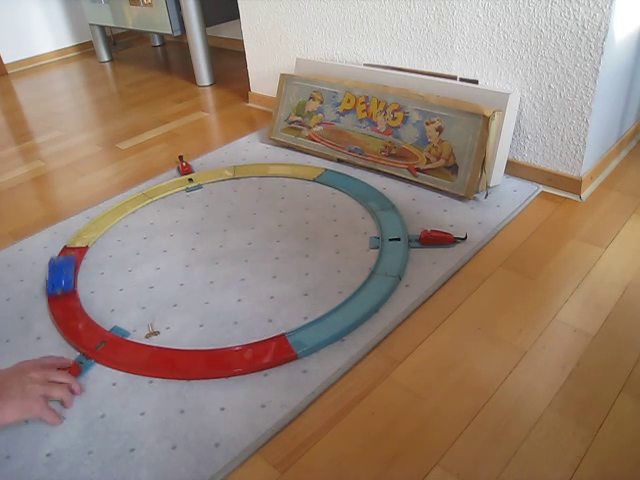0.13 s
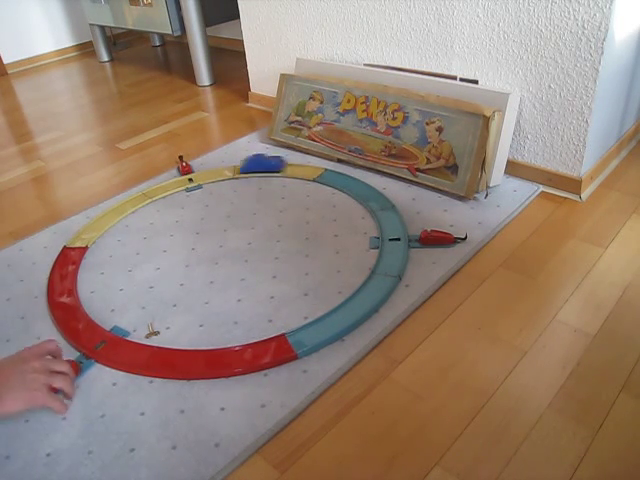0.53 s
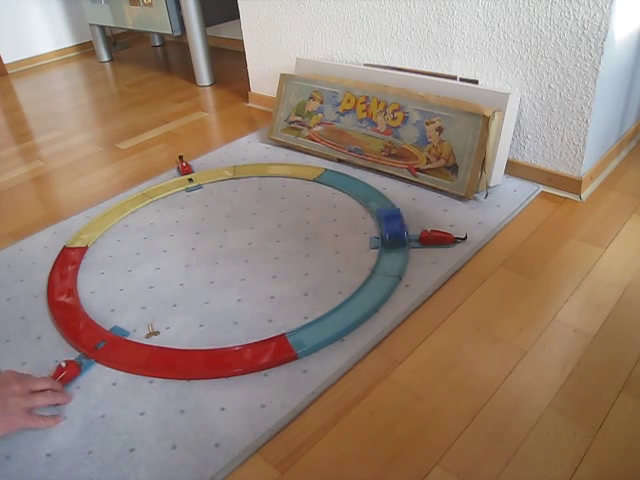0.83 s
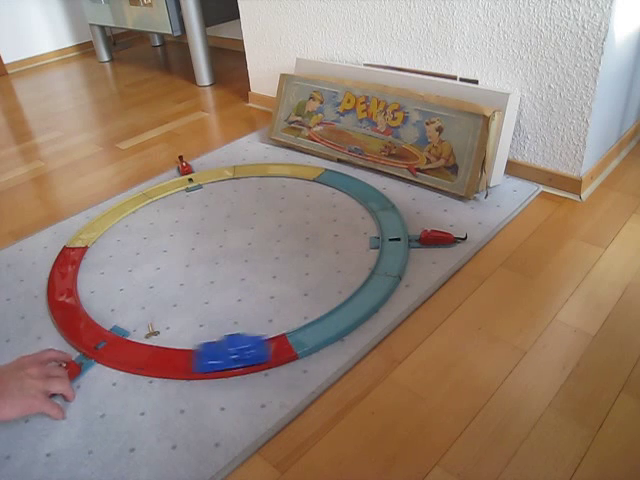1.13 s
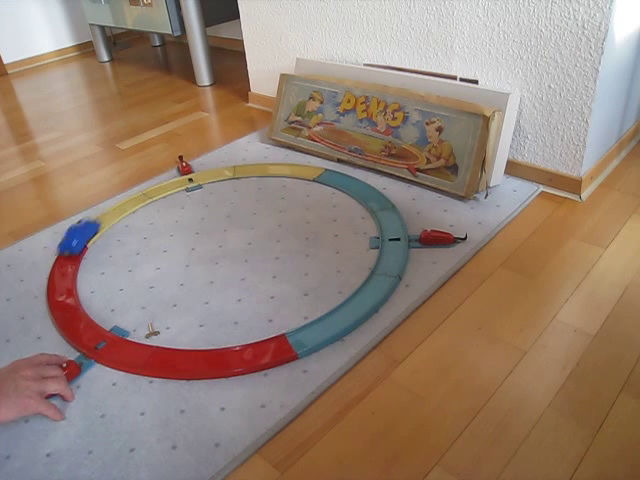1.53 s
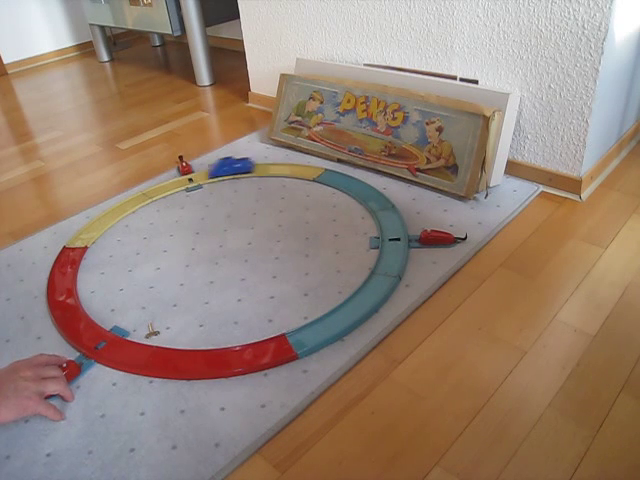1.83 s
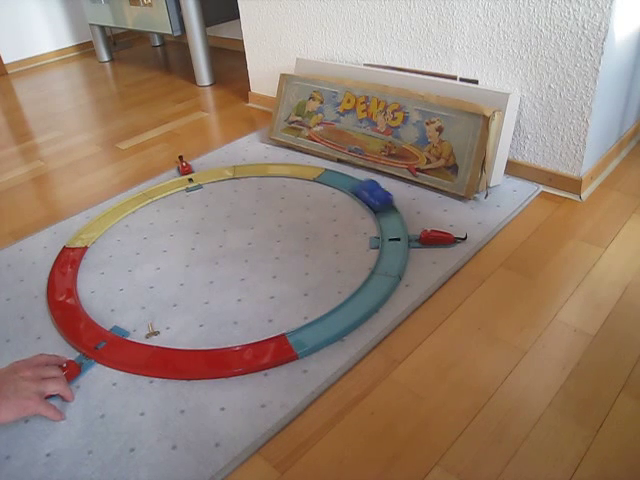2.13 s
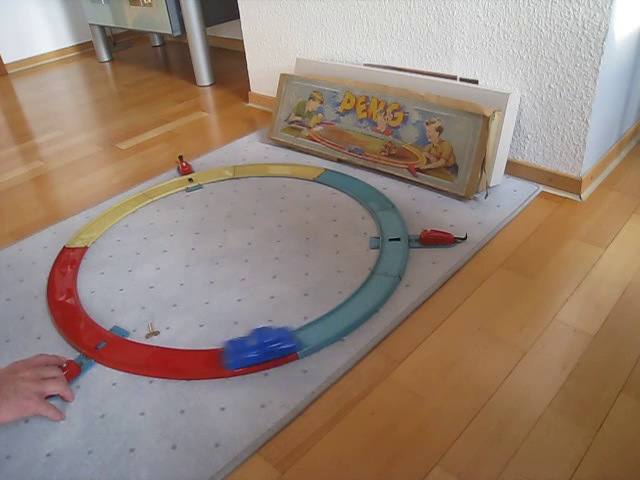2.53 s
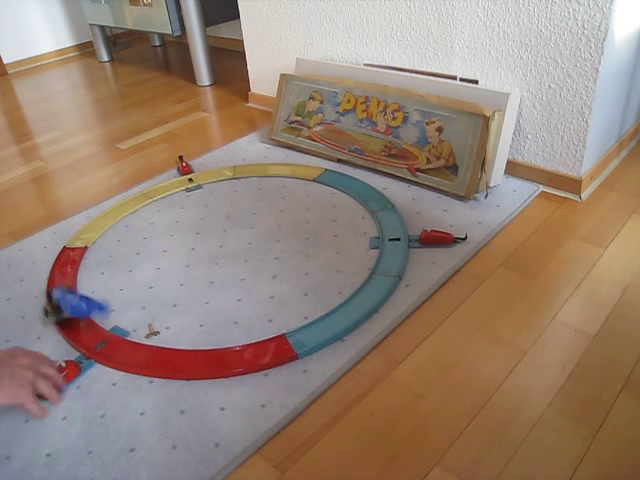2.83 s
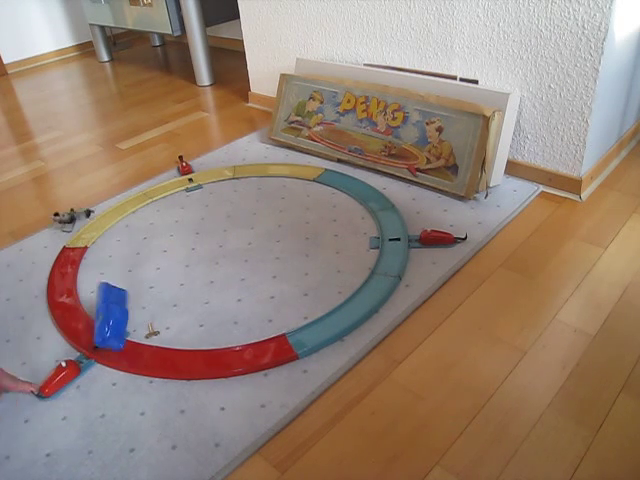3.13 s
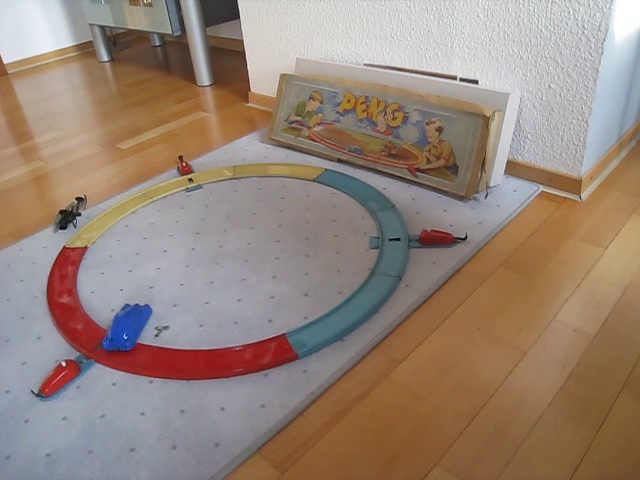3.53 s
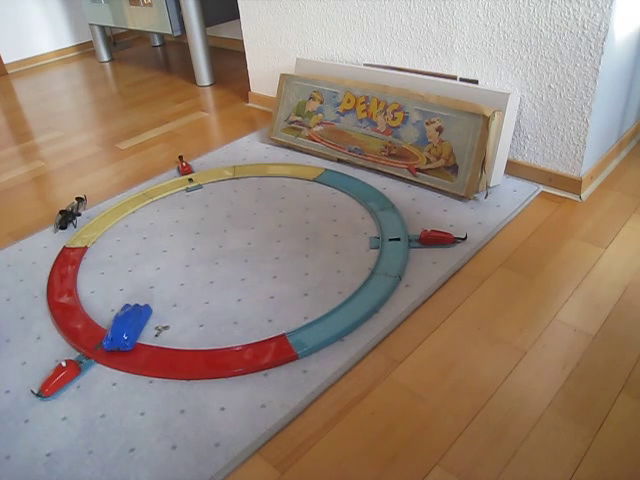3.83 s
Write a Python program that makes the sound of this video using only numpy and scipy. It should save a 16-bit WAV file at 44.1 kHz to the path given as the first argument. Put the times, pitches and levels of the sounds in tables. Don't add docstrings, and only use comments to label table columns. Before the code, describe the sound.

A clockwork tin car rattles steadily round hollow metal rails from 0 to 2.75 s, its gears fizzing brightly, with irregular sharp knocks and a tiny high squeal near 0.8 s. At about 2.77 s it crashes hard; the axle buzzes, the body skids and clatters, landing sharply around 3.23 s. It rocks briefly and the gears die by 3.6 s, leaving bare-room reverberation and faint hiss.

```python
import sys
import numpy as np
from scipy import signal
from scipy.fft import rfft, irfft, next_fast_len
from scipy.io import wavfile
from scipy.ndimage import uniform_filter1d, map_coordinates

SR = 44100
rng = np.random.default_rng(int(sys.argv[2]) if len(sys.argv) > 2 else 0)


def field_ratio(decibels):
    return 10 ** (np.asarray(decibels, dtype=float) / 20)


def store_pcm(level_fs):
    pcm = np.round(np.clip(level_fs, -1, 1) * 32767).astype(np.int16)
    wavfile.write(sys.argv[1], SR, np.atleast_2d(pcm).T)


N = 176400


def unit(x):
    return x / np.sqrt(np.mean(x ** 2) + 1e-20)


def along(points, hz):
    f, v = np.transpose(points)
    return np.interp(np.log(hz + 1), np.log(f + 1), v)


def curve(rows, axis=1):
    rows = np.array(rows)
    return np.interp(np.arange(N) / SR, rows[:, 0], rows[:, axis], left=-120, right=-120)


def wobble(rate):
    return map_coordinates(rng.standard_normal(4000), [np.arange(N) * rate / SR])


def filtered(x, response):
    m = next_fast_len(len(x) + 8192)
    return irfft(rfft(x, m) * response(np.fft.rfftfreq(m, 1 / SR)), m)[:len(x)]


def coloured(x, colour):
    return filtered(x, lambda f: field_ratio(along(colour, f)))


def low_cut(x, hz):
    return filtered(x, lambda f: (1j * f / (hz + 1j * f)) ** 2)


def resonances(table):
    def peak(f, c, w, db):
        return field_ratio(db) * 1j * f * w / (c * c - f * f + 1j * f * w)
    return lambda f: sum((-1) ** k * peak(f, *row) for k, row in enumerate(table))


def contacts(rate, spread_db, hiss):
    chance, size = rng.random(N), rng.exponential(size=N)
    sign, slide = rng.standard_normal((2, N))
    impacts = (chance < rate / SR) * field_ratio(spread_db * np.minimum(size, 4)) * np.sign(sign)
    return unit(unit(impacts) + hiss * slide)


def patches(x, depth_db):
    z = signal.stft(x, nperseg=512)[2]
    field = uniform_filter1d(uniform_filter1d(rng.standard_normal(z.shape), 3, 0), 10, 1)
    y = signal.istft(z * field_ratio(depth_db * unit(field)), nperseg=512)[1][:N]
    steady_s = .2
    return y / np.sqrt(np.abs(uniform_filter1d(y ** 2, round(steady_s * SR))) + 1e-20)


def ticks():
    taps_per_s, t60_s = 110, 0.0095
    starts = (rng.random(N) < taps_per_s / SR) * field_ratio(2.7 * np.minimum(rng.exponential(size=N), 3))
    bursts = signal.fftconvolve(starts, field_ratio(-60 * np.arange(2000) / SR / t60_s))[:N]
    return unit(bursts * rng.standard_normal(N))


def gliding(x, hz, width_hz):
    turn = 2 * np.pi * np.cumsum(hz) / SR
    slow = lambda v: filtered(v, lambda f: 1 / (1 + 2j * f / width_hz) ** 2)
    return unit(slow(x * np.cos(turn)) * np.cos(turn) + slow(x * np.sin(turn)) * np.sin(turn))


def rolling():
    # t/s, level/dB
    roll_level = [(0, -15), (.03, -15.5), (.14, -18.5), (.4, -18.5), (.6, -18), (.77, -20), (.8, -24.5),
                  (.9, -17), (1, -17), (1.3, -20), (1.6, -18), (1.9, -19.5), (2.2, -18), (2.4, -18.5),
                  (2.6, -17.5), (2.755, -18.5), (2.775, -17)]
    # f/Hz, gain/dB
    roll_colour = [(59, -64), (100, -32), (373, -17.5), (991, -3), (1760, -3.5), (3470, -1), (7770, -12.5),
                   (12700, -25.5), (16000, -38)]
    # f/Hz, width/Hz, level/dB
    tin = [(990, 100, -37), (1395, 204, 9.5), (1920, 980, -26), (2780, 370, -38), (3113, 94, -24),
           (4685, 130, -9), (5200, 390, -5)]
    # t/s, upper ring f/Hz, upper share/dB, lower ring f/Hz, lower share/dB
    sing = [(0.0, 3530, -25, 2580, -35), (0.08, 3630, -18, 2340, -27), (0.15, 3460, -22, 2430, -11),
            (0.52, 3720, -13.5, 2480, -22), (0.67, 3380, -10.5, 2345, -17), (1.05, 3960, -14.5, 2340, -18),
            (1.09, 3500, -3, 2560, -21), (1.16, 4030, -19, 2520, -18), (1.44, 3370, -12, 2470, -21),
            (2.0, 3650, -16, 2460, -17), (2.04, 3300, -11, 2380, -17), (2.3, 3900, -19, 2400, -20),
            (2.71, 3600, -19, 2530, -34), (2.77, 3670, -20, 2340, -16)]
    sing_width = (690, 400)

    def ring(column, width_hz, wobble_rate):
        patchy_db = 2.5 * wobble(wobble_rate)
        tone = gliding(drive, np.abs(curve(sing, axis=column)), width_hz)
        return field_ratio(curve(sing, axis=column + 1) + patchy_db) * tone

    unevenness_db = 0.46 * wobble(23.97) + 1.17 * wobble(90) + 0.15 * wobble(9.83)
    drive = contacts(2500, spread_db=1.5, hiss=0.7) * field_ratio(unevenness_db) + field_ratio(-12.5) * ticks()
    rattle = filtered(drive, lambda f: field_ratio(along(roll_colour, f)) * (1 + field_ratio(-1.9) * resonances(tin)(f)))
    upper = ring(1, sing_width[0], 13.6)
    lower = ring(3, sing_width[1], 14.2)
    return field_ratio(curve(roll_level) - 0.5) * (patches(rattle, depth_db=1.95) + upper + lower)


def gears():
    # t/s, level/dB
    gear_level = [(0, -19), (.4, -24.5), (.8, -22.5), (1.1, -22.5), (1.35, -22), (1.7, -24.5),
                  (2.06, -25.5), (2.3, -22.5), (2.6, -24.5), (2.76, -23), (2.85, -15.5), (2.95, -20),
                  (3.15, -17), (3.23, -22), (3.27, -27), (3.39, -22.5), (3.48, -32), (3.62, -57)]
    # f/Hz, gain/dB
    gear_colour = [(2000, -46.5), (4000, 1), (4900, 1.5), (6000, 1.5), (7000, -2), (9000, 5), (13000, 4),
                   (17000, 3)]
    unevenness_db = 1.3 * wobble(22.66) + 1.7 * wobble(118) + 0.46 * wobble(32.2)
    drive = contacts(4000, spread_db=3.5, hiss=0.73) * field_ratio(unevenness_db)
    return field_ratio(curve(gear_level) - 1.0) * patches(coloured(drive, gear_colour), depth_db=1.5)


def knocks():
    # t/s, peak/dB, centre f/Hz, t60/s, thump/dB
    knock_list = [(0.0045, 4.5, 5000, 0.017, -53), (0.834, -1, 9900, 0.057, -51),
                  (1.2555, -2, 2550, 0.028, -57), (1.3132, -5.5, 2970, 0.056, -53),
                  (2.1184, -7, 3500, 0.025, -45), (2.7602, -7, 6950, 0.01, -35),
                  (2.7639, 1.5, 6960, 0.062, -34), (2.7688, 3, 11000, 0.054, -9.5),
                  (2.7714, 0.5, 1490, 0.049, -36), (2.7871, 15, 6660, 0.026, -34),
                  (2.8935, 0, 2500, 0.04, -47), (2.896, -3, 2200, 0.1, -50),
                  (3.0063, 4.5, 4940, 0.03, -14.5), (3.061, -2.5, 5000, .06, -28),
                  (3.2236, 0, 10800, 0.028, -48), (3.235, 3, 3460, 0.022, -22),
                  (3.2673, -3.5, 1500, 0.023, -50), (3.182, -8, 10000, .02, -55),
                  (3.2, -7, 11000, .02, -57), (3.53, -20.5, 11000, 0.023, -66),
                  (0.152, -5.5, 2960, 0.15, -36), (0.307, -10, 3470, 0.1, -46),
                  (0.356, -6, 3800, 0.069, -43), (1.165, -8.5, 4700, .05, -50),
                  (1.366, -8, 5200, 0.064, -50), (0.978, -10, 3500, .05, -42),
                  (1.855, -8.5, 3600, 0.04, -50), (0.067, -4, 5400, 0.032, -50),
                  (0.1351, -10, 2210, 0.033, -48), (0.1997, -9, 2320, 0.033, -50),
                  (0.24, -21, 2430, 0.018, -50), (1.4386, -5.5, 3060, 0.059, -50),
                  (1.8076, -11, 3460, .03, -50), (1.8971, -14, 1480, .03, -48),
                  (2.065, -16, 3300, 0.026, -50), (2.6612, -8, 3820, 0.028, -48),
                  (2.586, -5, 12000, .02, -50), (1.655, -7, 2390, 0.059, -52),
                  (1.692, -8, 3000, 0.034, -50)]
    # f/Hz, level/dB, t60/s
    body = [(872, -3, .03), (1290, 6, .04), (2580, 0, .08), (3480, -4, .05), (4090, -6, .04),
            (5300, -6, .04), (6900, -5, .05), (9790, -8, .025), (10800, -6, .02), (12700, -9, .02),
            (13830, -9, .02)]
    octaves, broad, thump_hz, ring_db = 0.98, 0.086, 440, -28
    out, t = np.zeros(N + SR), np.arange(SR // 4) / SR
    for s, db, hz, t60, thump_db in knock_list:
        def near(f):
            bump = np.exp(-np.log2((f + 1) / hz) ** 2 / (2 * octaves ** 2))
            return bump + broad * f / (f + 400)

        decay = field_ratio(-60 * t / t60) + .8 * field_ratio(-60 * t / .008)
        attack = 1 - np.exp(-t / .0002)
        crack = unit(filtered(rng.standard_normal(len(t)), near)) * decay * attack
        ring = 0
        for f, level, d in body:
            fall = field_ratio(level + rng.normal(0, 1.7) - 60 * t / d)
            ring = ring + near(f) * fall * np.sin(2 * np.pi * f * t)
        u = 2 * np.pi * thump_hz * t
        thump = u * (1 - .3 * u) * np.exp(1 - u)
        hit = field_ratio(db - 9) * crack + field_ratio(db + ring_db) * ring + field_ratio(thump_db) * thump
        out[round(s * SR):][:len(t)] += hit
    return out[:N]


def squeal():
    # t/s, pitch f/Hz, level/dB
    whistle = [(0.761, 9200, -30), (0.766, 9200, -19), (0.774, 9200, -18), (0.7765, 10900, -27),
               (0.783, 12700, -19), (0.789, 14000, -17), (0.797, 13800, -30), (0.805, 13400, -21),
               (.82, 13800, -38)]
    hz = curve(whistle) * (1 + .025 * wobble(900))
    level_db = curve(whistle, axis=2) + 4 * wobble(500)
    return field_ratio(level_db) * np.sin(2 * np.pi * np.cumsum(hz) / SR)


def slaps():
    # t/s, peak/dB
    slap_list = [
        (2.7707, -9),
        (2.8935, -14),
        (3.0065, -9),
        (3.0625, -17),
        (3.2340, -3),
        (3.2675, -11),
        (3.2705, -13),
        (3.3035, -13),
        (3.318, -14),
        (3.347, -16),
    ]
    # f/Hz, level/dB, t60/s
    slap_modes = [(870, -12, .025), (1370, -2, .03), (1980, -11, .02), (2580, -11, .09), (3400, -12, .02),
                  (4900, -12, .015)]
    out, t = np.zeros(N + SR), np.arange(SR // 8) / SR
    for s, db in slap_list:
        ring = 0
        for f, level, d in slap_modes:
            fall = field_ratio(level + rng.normal(0, 1.2) - 60 * t / d)
            detune = 1 + 0.018 * rng.normal()
            ring = ring + fall * np.sin(2 * np.pi * f * detune * t)
        out[round(s * SR):][:len(t)] += field_ratio(db) * ring
    return low_cut(out[:N], 600)


def tumble():
    # t/s, level/dB
    spin_level = [(2.775, -29), (2.8, -16), (2.83, -19), (2.87, -16), (2.9, -20), (2.96, -23.5),
                  (3.02, -22), (3.1, -43)]
    # f/Hz, width/Hz, level/dB
    axle = [(4600, 1000, 0), (5200, 620, 4), (6900, 1200, -8)]
    # t/s, level/dB
    skid_level = [(2.80, -33), (2.885, -19), (2.9, -18), (2.95, -25), (3, -18.5), (3.06, -20),
                  (3.13, -19.5), (3.2, -30), (3.24, -20.5)]
    # f/Hz, gain/dB
    skid_colour = [(180, -48), (300, -24), (536, 0.5), (653, -3), (1330, 4), (1440, 0.5), (2000, 3),
                   (7000, -10), (9100, -34), (15400, -120)]
    # t/s, level/dB
    rock_level = [(3.232, -38), (3.25, -24), (3.28, -23.5), (3.31, -21.5), (3.35, -23), (3.42, -34.5),
                  (3.5, -43)]
    # f/Hz, width/Hz, level/dB
    shell_peaks = [(703, 110, 1.5), (900, 280, 2), (1300, 340, 4.5), (1870, 300, 1), (2580, 145, 5.5)]
    spin = filtered(contacts(2200, spread_db=2.1, hiss=1.0), resonances(axle))
    skid = coloured(contacts(1800, spread_db=3.4, hiss=0.55) * field_ratio(2.9 * wobble(40)), skid_colour)
    rocking = contacts(1500, spread_db=1.8, hiss=0.92) * field_ratio(2.2 * wobble(45))
    rock = filtered(rocking, resonances(shell_peaks))
    buzz = field_ratio(curve(spin_level)) * unit(spin)
    scrape = field_ratio(curve(skid_level)) * patches(skid, depth_db=1.0)
    return buzz + scrape + field_ratio(curve(rock_level)) * unit(rock)


def axle_ring():
    # t/s, level/dB
    axle_ring_level = [(2.785, -36), (2.79, -24), (2.83, -20), (2.86, -25), (2.9, -35)]
    # f/Hz, width/Hz, level/dB
    axle_ring_peak = [(7000, 300, 0)]
    return field_ratio(curve(axle_ring_level)) * unit(filtered(rng.standard_normal(N), resonances(axle_ring_peak)))


def room(x):
    # f/Hz, t60/s
    room_decay = [(200, 0.68), (1500, 0.82), (5000, 0.69), (14000, 0.25)]
    step = round(.25 * SR)
    out = np.zeros(N + 3 * SR)
    padded, fade = np.pad(x, (step, 2 * step)), np.hanning(2 * step)
    for i in range(0, N + step, step):
        hz, t, z = signal.stft(rng.standard_normal(3 * SR // 4), SR, nperseg=256)
        decay = field_ratio(-60 * t / along(room_decay, hz)[:, None])
        tail = signal.istft(z * decay, SR, nperseg=256)[1]
        wet = signal.fftconvolve(padded[i:i + 2 * step] * fade, tail / np.linalg.norm(tail))
        out[i:i + len(wet)] += wet
    return out[step - 150:][:N]


def quiet_floor():
    # f/Hz, gain/dB
    floor_colour = [(20, 4.5), (150, 1), (340, -1.5), (506, -1.5), (3000, -12), (11400, -20.5),
                    (15000, -27), (17500, -21.5)]
    return field_ratio(-47) * unit(coloured(rng.standard_normal(N), floor_colour))


def scene():
    car = rolling() + gears() + squeal() + tumble() + axle_ring()
    hits, shell = knocks(), slaps()
    sent = field_ratio(-7) * car + field_ratio(-3) * hits + field_ratio(-12.5) * shell
    wet = room(low_cut(sent, 448))
    return (field_ratio(1.5) * car + hits + shell + wet + quiet_floor())[None]


def band_limit(x):
    return signal.sosfilt(signal.butter(12, 18060, fs=SR, output="sos"), x)


def record(dry):
    # f/Hz, gain/dB
    mic = [(20, -10), (90, -3.5), (14500, -1.5), (17500, -19.5)]
    # t/s, depth/dB
    ducks = [
        (0.005, 7),
        (0.785, 2),
        (0.834, 2.5),
        (2.765, 4.5),
        (2.77, 11.5),
        (2.787, 7),
        (2.894, -1.5),
        (3.009, 7),
        (3.224, -0.5),
        (3.236, 2.5),
    ]
    grab_s, let_go_s = .003, .1
    duck_db = np.zeros(N)
    for s, db in ducks:
        late = np.maximum(np.arange(N) / SR - s, 0)
        duck_db += db * (1 - np.exp(-late / grab_s)) * np.exp(-late / let_go_s)
    heard = coloured(dry[0], mic) + field_ratio(-67) * rng.standard_normal(N)
    ducked = heard * field_ratio(-duck_db)
    limited = ducked / (1 + np.abs(ducked) ** 6) ** (1 / 6)
    mix = filtered(limited, lambda f: f < 17250)[None]
    return band_limit(mix)


dry = scene()
out = record(dry)
store_pcm(out)
```